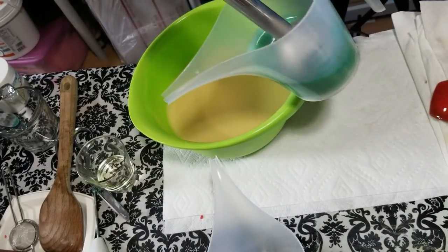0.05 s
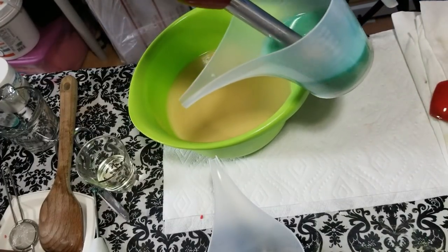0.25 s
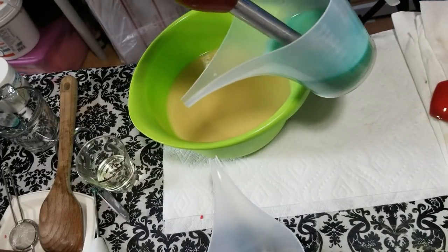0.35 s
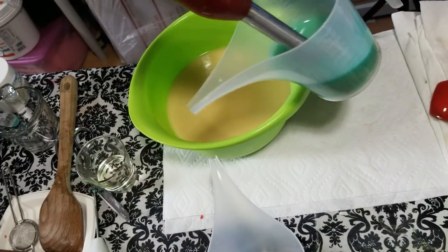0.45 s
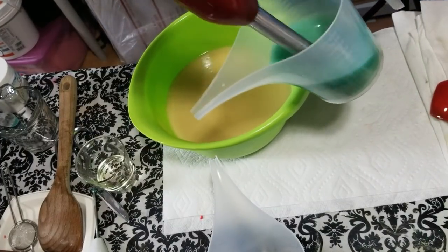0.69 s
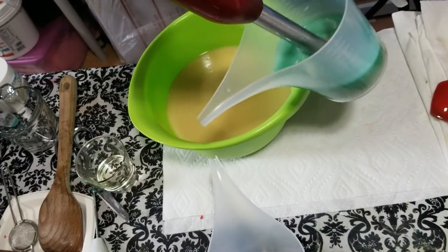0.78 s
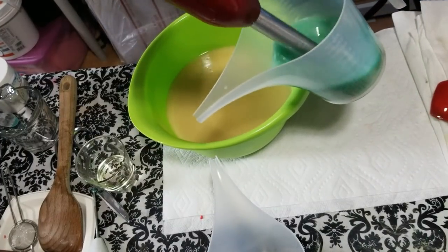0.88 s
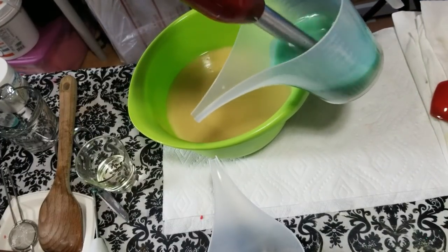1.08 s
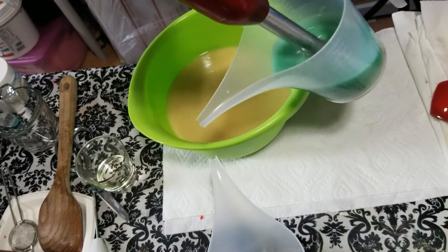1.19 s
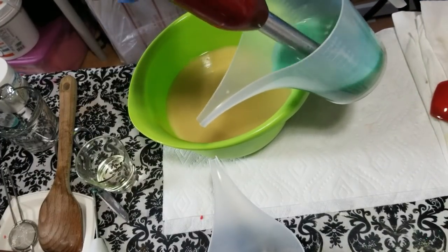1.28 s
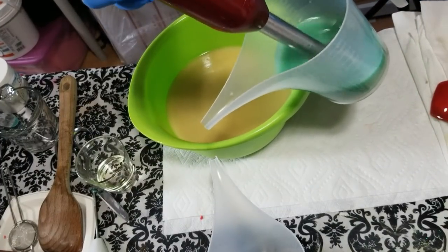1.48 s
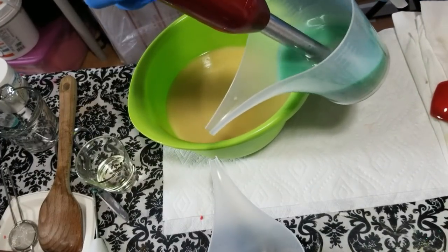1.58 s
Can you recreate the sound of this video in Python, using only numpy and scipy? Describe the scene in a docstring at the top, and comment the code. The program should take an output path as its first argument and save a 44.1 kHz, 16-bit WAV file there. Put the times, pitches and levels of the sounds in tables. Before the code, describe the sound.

A hollow liquid plop, then a switched-off stick blender knocks lightly in a plastic pitcher.

```python
"""A stick blender, motor off, is worked about in a plastic pitcher of thick liquid on a kitchen table.
Air trapped under the blade guard escapes with one hollow plop. The steel guard then knocks and
scrapes on wall and bottom, ringing the pitcher's modes and twice clinking itself.
A small room answers, over faint hum and hiss."""
import sys
import numpy as np
from scipy import signal
from scipy.fft import rfft, irfft, next_fast_len
from scipy.io import wavfile

SR = 44100
rng = np.random.default_rng(int(sys.argv[2]) if len(sys.argv) > 2 else 0)


def store_wav(level_fs):
    """Save 16-bit WAV to argv[1]."""
    pcm = np.round(np.clip(np.atleast_2d(level_fs), -1, 1) * 32767)
    wavfile.write(sys.argv[1], SR, pcm.T.astype(np.int16))


N = 72765

# guard on pitcher: start_s, strength_db, then band gains thud_db, body_db, wall_db, clack_db, click_db
KNOCK_EVENTS = [(0.4564, -47.5, -20, -6, 11, 1, 6), (0.5135, -29, -2.5, -1.5, 0.5, -6, -3),
                (0.596, -26.5, 0.5, -0.5, 4.5, 7.5, 7.5), (0.6535, -40, 7, -1.5, 1, 4, 4.5),
                (0.686, -29, -3, -7.5, 1, -2, -2.5), (0.7162, -31.5, -9, -1.5, 9, 1.5, 2.5),
                (0.7716, -25.5, 1.5, -5.5, -6, -8, -8.5), (0.8096, -39.5, 0, -1, -13, -11, -7),
                (0.8322, -31.5, 5.5, -1.5, 0.5, 4, 2), (0.8614, -46.5, 16, 1, 9.5, -12, -11),
                (0.912, -47, 12.5, 0.5, 0, -9, -27), (0.941, -43.5, 8, -4, 4, -7, -12),
                (0.9588, -45, -9, 0.5, 13, -1, 4), (0.9848, -38.5, 9, -6.5, 1, -6.5, -6),
                (1.0304, -37.5, 3, 1, 5, 5.5, 2.5), (1.0593, -40.5, 8.5, -8.5, 0, 1.5, -3.5),
                (1.125, -36, 9, 1, 2, 6, -6), (1.1289, -29.5, -14, -19, 0.5, 2.5, 3.5),
                (1.1371, -43.5, 11, 0, 6, 12, -25), (1.1865, -42, 8, -4.5, -3.5, -18, -2),
                (1.2289, -41, 15.5, -1, 4, 7, 2), (1.2499, -48, -31, 2.5, 5.5, 9.5, -3),
                (1.2674, -49, 11, 1, -2, -10, -22), (1.3168, -41.5, 3, -3.5, -0.5, -7.5, -19),
                (1.333, -39, 5, -6.5, -9, -12, -11), (1.384, -51.5, 19, 1, -6, 1.5, -32),
                (1.4221, -37.5, 7, 2, 6, 10, 2), (1.4465, -43, 0, 4.5, -2.5, 7, -1),
                (1.4623, -50, 17, -4.5, 10, -11, -23), (1.5018, -49.5, 2, -5, 6.5, -9, -3),
                (1.5214, -41.5, 10.5, -2.5, 3.5, -7.5, -6)]
# those five bands: centre_hz
KNOCK_BANDS_HZ = [140, 620, 1380, 2400, 5500]
# filled pitcher on the table: pitch_hz, level_db, t60_s
PITCHER_MODES = [(74.7, -30, 0.36), (136.7, -18, 0.11), (267.3, -9, 0.044), (370.7, -12, 0.11),
                 (426, -4, 0.069), (591.6, 3.5, 0.04), (830, 0.5, 0.037), (1275, -7, 0.025),
                 (1426, -5, .02), (1755, -8.5, 0.031), (2032, -2.5, 0.043), (2800, -3.5, 0.0066),
                 (4770, -8, 0.0069)]
# hollow main resonance, shifting as the guard moves: time_s, pitch_hz
BODY_TRACK = [(.6, 746), (.7, 655), (.78, 758), (.85, 740), (1.125, 717), (1.23, 723)]
# dense wall modes at contact: freq_hz, gain_db
CRACK_EQ = [(200, 2.5), (700, 4), (1400, 5), (2100, 2.5), (2550, -3.5), (3100, -5.5), (5200, -14.5),
            (7000, -23.5), (10000, -29.5), (14000, -25)]
# part of the crack that differs between channels: freq_hz, gain_db
CRACK_SIDE_EQ = [(100, -12), (400, -17), (1200, -3.5), (2500, 5.5), (6000, -1)]
# gaps between wall resonances: centre_hz, half_width_hz, gain_db
WALL_NOTCHES = [(1200, 70, -4), (2520, 170, -8), (3750, 200, -4)]
# steel guard: pitch_hz, level_db, t60_s
GUARD_MODES = [(1823, -5, 0.057), (3180, 0, 0.021), (4400, -2, 0.0095)]
# glancing blows: start_s, level_db
CLINK_EVENTS = [(0.6868, -33.5), (1.2296, -40)]
# scrape envelope: time_s, level_db
SCRAPE_TRACK = [(0, -56), (0.062, -73), (.18, -92), (.33, -73.5), (.44, -65), (.52, -46), (.66, -61.5),
                (.8, -51), (.95, -54.5), (1.04, -54.5), (1.1, -63), (1.25, -54.5), (1.37, -64), (1.46, -52),
                (1.54, -75), (1.6, -75), (1.65, -87)]
# scrape spectrum: freq_hz, gain_db
SCRAPE_EQ = [(40, -14.5), (120, 1.5), (370, 2), (750, -9), (1450, -6), (2100, -9.5), (5000, -24.5),
             (9000, -46)]
# air leaving the guard: start_s, pitch_hz, level_db, swell_s
PLOP_EVENT = (.2111, 768, -5.6, .0031)
# after-bubbles and low gurgles: start_s, pitch_hz, level_db, swell_s
BUBBLE_EVENTS = [(.4765, 726, -36, 0.0051), (.4905, 830, -45, 0.0017), (0.515, 344, -38.5, .012),
                 (.773, 323, -39.5, 0.016)]
# radiation from the liquid surface: freq_hz, gain_db
SURFACE_EQ = [(60, -1), (200, -1), (450, -4), (1000, -0.5), (1350, 7), (2000, -22.5), (3000, -29.5)]
# wet snap of air breaking out: freq_hz, gain_db
SNAP_EQ = [(200, -8), (1250, 10.5), (2000, 7), (3000, -36), (6300, -14.5), (7000, 2.5), (7700, -20.5),
           (14000, -14)]
# liquid closing over the air pocket: freq_hz, gain_db
SLOSH_EQ = [(100, -27), (500, -2), (1050, -2.5), (1400, -13.5), (5000, -38)]
# pitcher's hollow: pitch_hz, level_db, t60_s
HOLLOW_MODES = [(560, -33, .08), (715, -36, .15), (815, -23.5, .19), (915, -29, .12), (1080, -38, .12)]
# direct sound, left minus right: freq_hz, difference_db
DIRECT_BALANCE = [(200, 1.5), (700, -1.1), (1800, 3.5), (3000, 1.5), (5000, -6), (9000, -10.5), (14000, 8)]
# nearby surfaces: delay_s, left_db, right_db
REFLECTIONS = [(.0125, -27, -13.5), (0.0199, -15.5, -29), (.029, -31, -19), (.041, -50.5, -22),
               (.060, -29.5, -45)]
# diffuse tail spectrum: freq_hz, gain_db
TAIL_EQ = [(80, -8.5), (300, 1.5), (800, -5.5), (2000, -7.5), (5000, -5.5), (7200, 1.5), (14000, 3)]
# diffuse tail decay: freq_hz, t60_s
TAIL_DECAY = [(150, 0.047), (800, 0.24), (6500, 0.28), (12000, 0.22)]
# opening wash: freq_hz, gain_db
WASH_EQ = [(100, -14), (350, 3), (700, -3), (1600, 4.5), (3200, -4), (6000, -12.5), (14000, -13.5)]
# room hiss: freq_hz, gain_db
HISS_EQ = [(25, -1.5), (60, 3.5), (120, 9.5), (200, -10.5), (380, 0.5), (700, -17), (1700, -3), (2800, -18),
           (6000, -15), (9500, -32), (13000, -9), (15000, -21.5)]


def knocks():
    """Each contact cracks and rings the pitcher's modes; place and force set the colour."""
    detune, scatter_db, mode_lag_s = .024, 2.2, .00003
    body_db, body_t60_s, body_swell_s = 13, .025, .0025
    crack_db, crack_t60_s, crack_width = 3, .024, .74
    spike_s, spike_height = .0005, 7.7
    contact_s, left_lag_s = .00034, .00005
    out, t = np.zeros((2, N)), np.arange(SR // 6) / SR
    mode_hz, mode_db, t60_s = np.array(PITCHER_MODES).T[:, :, None]
    for start_s, strength_db, *band_db in KNOCK_EVENTS:
        # each knock lands elsewhere, so the modes scatter
        pitch_draw, level_draw, lag_draw = rng.standard_normal((3, len(PITCHER_MODES), 1))
        pitch_hz = mode_hz * (1 + detune * pitch_draw)
        envelopes = undb(mode_db + scatter_db * level_draw) * fade(t, t60_s)
        clocks = [t + side * mode_lag_s * lag_draw for side in (1, -1)]
        ring = np.array([(envelopes * np.sin(2 * np.pi * pitch_hz * c)).sum(0) for c in clocks])
        body_hz = np.interp(start_s, *np.array(BODY_TRACK).T)
        body = ringing([(body_hz, body_db, body_t60_s)], t, body_swell_s)
        noise = rng.standard_normal((3, len(t)))
        add(noise[0], spike_s, np.array([spike_height]))  # first touch
        stereo_noise = noise[0] + crack_width * colour(noise[1:], CRACK_SIDE_EQ)
        crack = undb(crack_db) * unit(colour(stereo_noise, CRACK_EQ)) * fade(t, crack_t60_s)
        sub = (24.8, -5)  # Hz, dB: little deep bass radiates
        top = (9700, band_db[-1] + .06 * (strength_db + 5.5))  # harder is brighter
        hit = (crack - ring - body) * (1 - np.exp(-t / contact_s))
        hit = colour(hit, [sub, *zip(KNOCK_BANDS_HZ, band_db), top]) * undb(strength_db + 1)
        add(out[0], start_s + left_lag_s, hit[0])
        add(out[1], start_s, hit[1])
    return out


def scrape(slips_per_s=1300):
    """Tiny slips of the guard along the plastic."""
    slips = (rng.random(N) < slips_per_s / SR) * rng.standard_normal(N)
    level_db = np.interp(np.arange(N) / SR, *np.array(SCRAPE_TRACK).T)
    return unit(colour(slips, SCRAPE_EQ)) * undb(level_db)


def wall(x):
    """The plastic wall passes less between its groups of resonances."""
    freq_hz = np.geomspace(500, 6000, 200)
    gain_db = sum(db * np.exp(-((freq_hz - hz) / width_hz) ** 2) for hz, width_hz, db in WALL_NOTCHES)
    return colour(x, list(zip(freq_hz, gain_db)))


def clinks():
    """Glancing blows ring the steel guard."""
    out, t = np.zeros(N), np.arange(SR // 6) / SR
    for start_s, level_db in CLINK_EVENTS:
        add(out, start_s, undb(level_db) * ringing(GUARD_MODES, t, swell_s=.00034))
    return out


def bubbles(rise_per_s=5, open_s=.0003):
    """Plop and after-bubbles: air pockets oscillate, rise in pitch and are damped by thick liquid."""
    out, t = np.zeros(N), np.arange(SR // 4) / SR
    for start_s, pitch_hz, level_db, swell_s in [PLOP_EVENT] + BUBBLE_EVENTS:
        envelope = np.exp(-(t / swell_s - 1) ** 2) * (1 - np.exp(-t / open_s))
        tone = np.sin(2 * np.pi * pitch_hz * (t + rise_per_s * t ** 2 / 2))
        add(out, start_s, undb(level_db) * colour(envelope * tone, SURFACE_EQ))
    return out


def breakout(snap_db=-34, slosh_db=-35.5, rise_per_s=.6):
    """The plop's air snaps out, liquid closes over it, the hollow rings on and rises slightly."""
    out, t = np.zeros((2, N)), np.arange(SR // 4) / SR
    snap = unit(colour(wide_noise(wide_hz=2500), SNAP_EQ))[:, :len(t)] * fade(t, t60_s=.016)
    slosh = unit(colour(wide_noise(wide_hz=800), SLOSH_EQ))[:, :len(t)] * fade(t, t60_s=.21)
    hollow = ringing(HOLLOW_MODES, t + rise_per_s * t ** 2 / 2, swell_s=.012)
    add(out, PLOP_EVENT[0], undb(snap_db) * snap + undb(slosh_db) * slosh + hollow)
    return out


def kitchen(x, tail_db=-6.5, onset_s=.0059):
    """Direct sound, reflections off hard surfaces and a short diffuse tail."""
    t, freq_hz = np.arange(N) / SR, np.fft.rfftfreq(N, 1 / SR)
    spectrum, tail = rfft(wide_noise(wide_hz=650)), 0
    for band_hz, t60_s in TAIL_DECAY:
        share = at([(hz, hz == band_hz) for hz, _ in TAIL_DECAY], freq_hz)
        tail = tail + irfft(spectrum * share, N) * fade(t, t60_s)
    tail *= 1 - np.exp(-(t / onset_s) ** 2)
    response = undb(tail_db) * colour(unit(tail), TAIL_EQ) / np.sqrt(N)
    for delay_s, left_db, right_db in REFLECTIONS:
        add(response, delay_s, undb([[left_db], [right_db]]))
    left = colour(x[0], [(hz, db / 2) for hz, db in DIRECT_BALANCE])
    right = colour(x[1], [(hz, -db / 2) for hz, db in DIRECT_BALANCE])
    return np.array([left, right]) + signal.fftconvolve(x, response, axes=1)[:, :N]


def background(hiss_db=-66, wash_db=-57, hum_db=-76.5, hum_hz=116):
    """Room hiss, mains hum and a soft wash dying away at the start."""
    t = np.arange(N) / SR
    hiss = undb(hiss_db) * unit(colour(wide_noise(wide_hz=1000), HISS_EQ))
    wash = undb(wash_db) * unit(colour(wide_noise(wide_hz=1400), WASH_EQ)) * fade(t, t60_s=.58)
    hum = undb(hum_db) * np.sqrt(2) * np.sin(2 * np.pi * hum_hz * t)
    return hiss + wash + hum


def undb(db):
    """dB to amplitude."""
    return 10 ** (np.asarray(db) / 20)


def unit(x):
    """Scale to rms 1."""
    return x / np.sqrt(np.mean(x ** 2))


def at(points, hz):
    """Interpolate (freq_hz, value) points over log frequency."""
    freq_hz, values = np.array(points, float).T
    return np.interp(np.log(np.maximum(hz, 1)), np.log(freq_hz), values)


def colour(x, eq):
    """Minimum-phase filter from (freq_hz, gain_db) points."""
    size = 2 * next_fast_len(x.shape[-1])
    gain = undb(at(eq, np.fft.rfftfreq(size, 1 / SR)))
    cepstrum = irfft(np.log(gain))
    cepstrum[1:size // 2] *= 2
    cepstrum[size // 2 + 1:] = 0
    return irfft(rfft(x, size) * np.exp(rfft(cepstrum)))[..., :x.shape[-1]]


def fade(t, t60_s):
    """Exponential decay, -60 dB at t60_s."""
    return np.exp(-np.log(1000) * t / t60_s)


def ringing(modes, t, swell_s):
    """Damped sines with a shared build-up."""
    ring = sum(undb(db) * fade(t, t60_s) * np.sin(2 * np.pi * hz * t) for hz, db, t60_s in modes)
    return ring * (1 - np.exp(-t / swell_s))


def add(out, start_s, x):
    """Mix x into out at start_s."""
    i = max(int(round(start_s * SR)), 0)
    out[..., i:i + x.shape[-1]] += x[..., :N - i]


def wide_noise(wide_hz):
    """Stereo noise, coherent in the bass, independent well above wide_hz."""
    mid, side = rfft(rng.standard_normal((2, N)))
    coherence = 1 / (1 + (np.fft.rfftfreq(N, 1 / SR) / wide_hz) ** 4)
    mid, side = mid * np.sqrt(1 + coherence), side * np.sqrt(1 - coherence)
    return unit(irfft(np.array([mid + side, mid - side]), N))


def scene():
    """Guard, pitcher and liquid in the kitchen, over the background."""
    pitcher = wall(knocks() + scrape()) + clinks() + bubbles() + breakout()
    return kitchen(pitcher) + background()


def record(dry):
    """Steep low-pass on the top treble."""
    cutoff_hz = 14750
    return signal.sosfilt(signal.ellip(8, .2, 70, cutoff_hz, fs=SR, output="sos"), dry)


dry = scene()
out = record(dry)
store_wav(out)
```